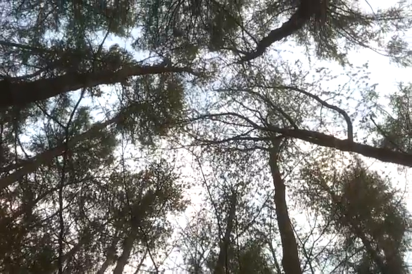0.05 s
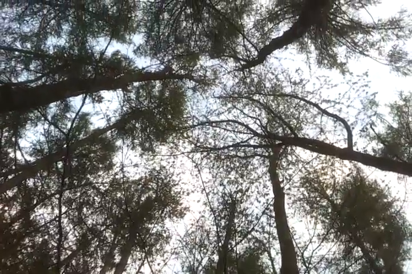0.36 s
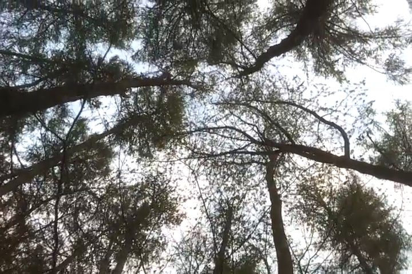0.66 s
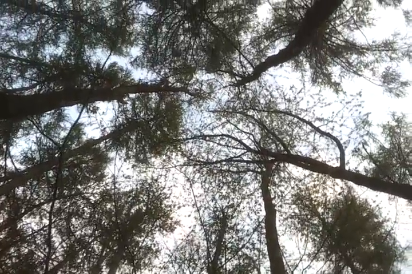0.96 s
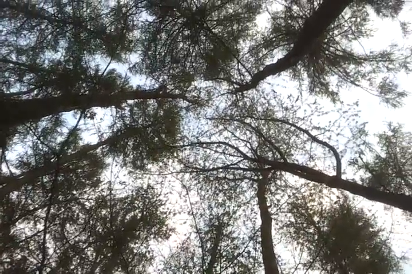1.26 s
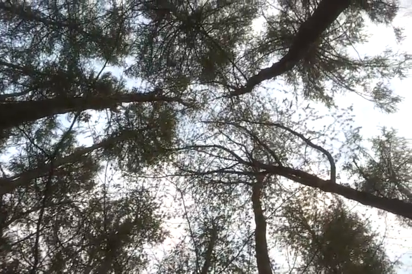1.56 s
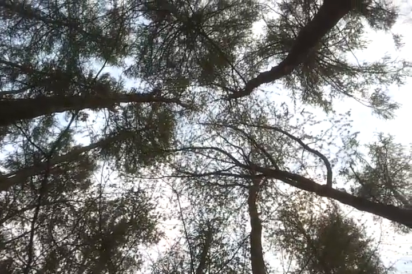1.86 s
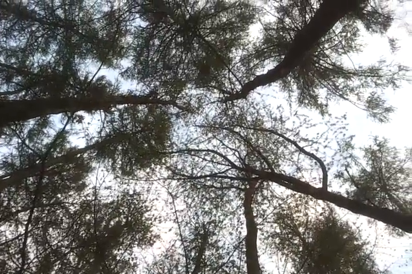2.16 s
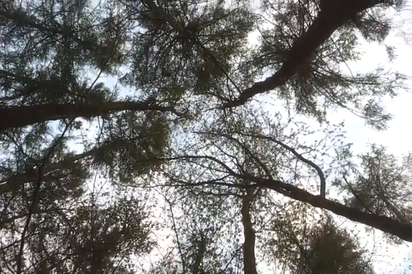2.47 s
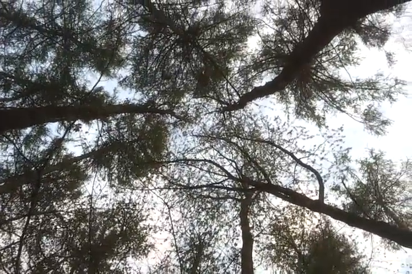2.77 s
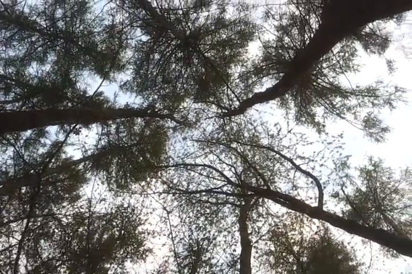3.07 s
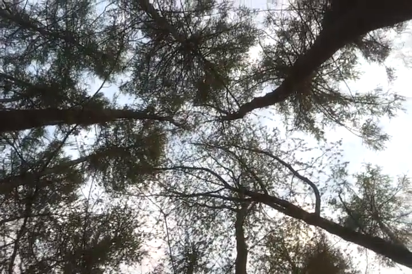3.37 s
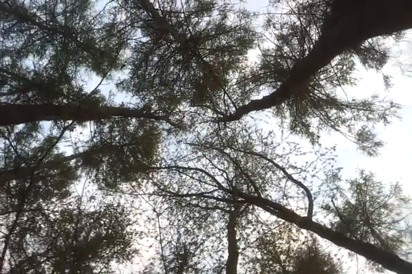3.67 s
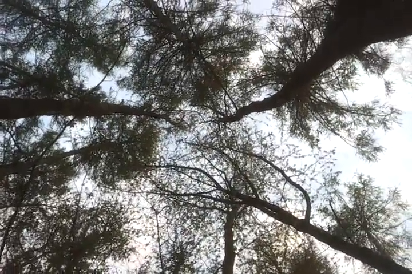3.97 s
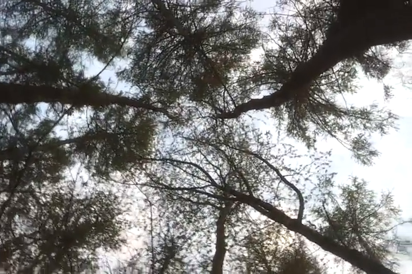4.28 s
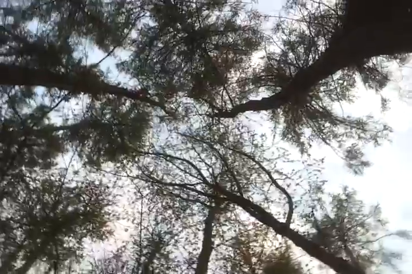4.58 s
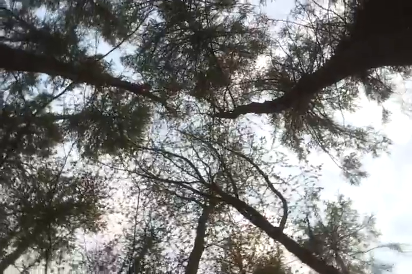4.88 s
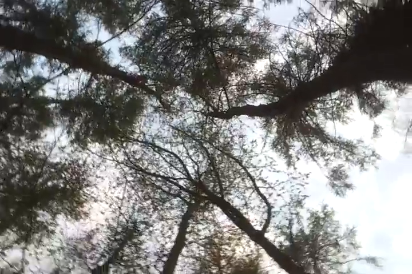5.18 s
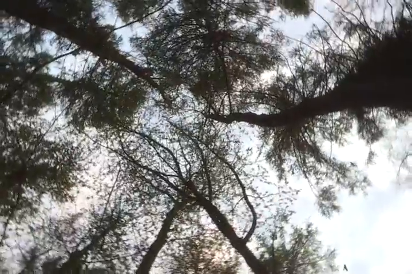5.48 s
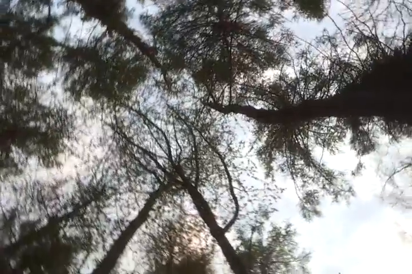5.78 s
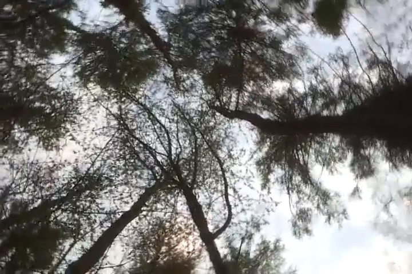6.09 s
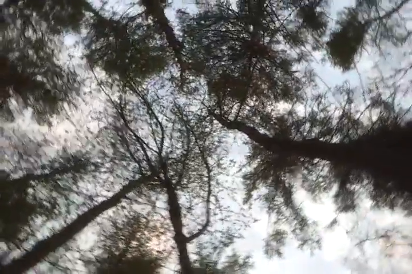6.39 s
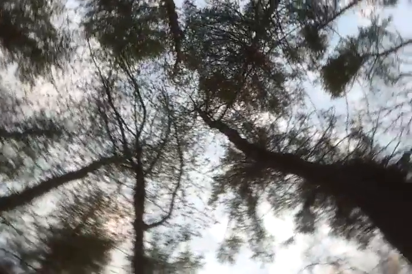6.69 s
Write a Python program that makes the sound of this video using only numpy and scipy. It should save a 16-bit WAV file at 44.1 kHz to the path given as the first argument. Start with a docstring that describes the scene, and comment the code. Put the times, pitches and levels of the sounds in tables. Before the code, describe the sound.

Wind strikes a phone microphone at once in a pine wood, with low rumbling, irregular knocks and overload ticks until about 1.9 seconds. Beneath it, small birds chirp thinly overhead, a distant bird gives faint reedy cries, and dry leaves rustle slightly around 1 second. A soft, steady hiss of trees lies behind everything.

From 2 seconds the wind sinks to a low rumble, with one bump near 2.6 and two tiny leaf crackles. The birds repeat high notes in quick, even series with soft echoing tails. The reedy cries return faintly around 3.3 seconds, and from about 4 to 4.7 a far bird draws a faint, lower whistle that slides down and up.

At 5.5 seconds a second, faster gust thumps and ticks on the microphone, with the loudest chirps above it, easing by the end near 7 seconds.

```python
"""A pine wood, on a phone's microphone, under the steady hiss of the trees. A gust knocks on the
microphone at once and overloads it until it ticks; small birds call high overhead, a distant one gives
reedy cries, and dry leaves rustle faintly underfoot. The wind sinks to a low rumble, the birds call on
in series, scattered into soft tails by trunks and crowns, and far off one draws a long, low whistle.
Last comes a second, faster gust, with the loudest calls above it."""
import sys
import numpy as np
from scipy import signal
from scipy.fft import rfft, irfft
from scipy.io import wavfile
from scipy.ndimage import uniform_filter1d, map_coordinates

SR = 44100
rng = np.random.default_rng(int(sys.argv[2]) if len(sys.argv) > 2 else 0)


def master_out(mix):
    """Clip the mix to full scale and print it as 16-bit PCM to the path in sys.argv[1]."""
    frames = np.transpose(np.atleast_2d(mix))
    ceiling = np.clip(frames, -1, 1)
    pcm = np.round(ceiling * 32767).astype(np.int16)
    wavfile.write(sys.argv[1], SR, pcm)


N = 302085
T = np.arange(N) / SR

# Eddies that strike the microphone. Each row: time in seconds, knock level in dB, tick level in dB.
STRIKES = [(0.047, -12, -15.5), (0.052, -18.5, -20), (0.092, -13.5, -30), (0.136, -16.5, -24),
           (0.17, -16, -23), (0.184, -18.5, -19), (0.221, -16, -27), (0.264, -16, -47), (0.311, -18.5, -26),
           (0.357, -19, -27.5), (0.388, -24.5, -43.0), (0.439, -11, -19), (0.487, -9.5, -29),
           (0.5, -16.5, -44), (0.546, -18, -45), (0.6, -11, -23.0), (0.634, -9, -41), (0.664, -19, -22),
           (0.685, -19.5, -40.5), (0.804, -18.5, -44.0), (0.816, -13, -25.5), (0.865, -14.5, -20.5),
           (0.917, -19.5, -41), (0.98, -16, -49), (1.038, -18, -40), (1.109, -24.5, -53.0),
           (1.214, -13, -43), (1.301, -17, -27.0), (1.387, -17, -24), (1.45, -11.5, -30.5),
           (1.518, -8.5, -46), (1.542, -14.5, -26), (1.552, -19, -30), (1.612, -25.5, -41),
           (1.641, -19, -56), (1.764, -14, -53), (1.81, -18.5, -53.0), (1.929, -33.5, -57),
           (2.584, -17.5, -53), (3.282, -37.5, -60), (3.459, -29, -48.0), (5.28, -29.5, -53.0),
           (5.521, -14.5, -34.5), (5.536, -9.5, -21), (5.656, -11.5, -19), (5.672, -9, -18.5),
           (5.713, -11, -16.0), (5.758, -6.5, -17), (5.779, -11, -27.5), (5.796, -11.5, -23.5),
           (5.821, -8, -28), (5.853, -14.5, -26), (5.863, -15.5, -17), (5.876, -10.5, -11.5),
           (5.911, -16, -19.5), (5.965, -13, -13), (5.983, -16, -22.0), (5.996, -14, -15.5),
           (6.011, -13, -21), (6.051, -17, -27.5), (6.083, -18.5, -49.5), (6.136, -12, -24),
           (6.153, -17.5, -27), (6.217, -12.5, -28), (6.227, -9.5, -16), (6.274, -14, -23.5),
           (6.308, -23, -24), (6.326, -20.5, -42.5), (6.496, -25, -52)]
# Wind at the microphone. Each row: time in seconds, strength of the flow in dB.
FLOW = [(0.0, -31.5), (0.05, -24), (.68, -24), (.76, -30), (1.85, -29), (2.06, -40.5), (2.54, -38),
        (2.62, -26.5), (2.98, -43), (3.26, -36), (4.3, -36.5), (5.62, -28.5), (5.76, -21), (6.73, -31.5),
        (6.85, -43)]
# Faster air lifts the second gust in pitch. Each row: time in seconds, relative speed.
AIR_SPEED = [(1.9, 0.97), (3.8, 0.92), (5.2, 1.1)]


def eddies(per_s=11, small_db=-4, scatter_db=3):
    """Every eddy that strikes, as (seconds, dB): the listed ones, and random ones that follow the flow."""
    chance = rng.random((int(per_s * N / SR), 2))
    times = chance[:, 0] * N / SR
    db = np.interp(times, *np.transpose(FLOW)) + small_db + scatter_db * (2 * chance[:, 1] - 1)
    return [(centre, knock_db) for centre, knock_db, _ in STRIKES] + list(zip(times, db))


def buffets(core_db=1.5, thump_db=-5, puff_db=-8, body_growth=0.46):
    """Each eddy knocks on the microphone: a short swing of pressure, a low thump just after, and a puff."""
    core_hz, core_s, thump_hz = 480, 0.00056, 105  # at a relative speed of 1
    thump_s, lag_s = 0.0028, 0.0038
    out, pattern = np.zeros(N), turbulence()
    t = np.arange(-SR // 40, SR // 40) / SR
    for centre, db in eddies():
        air, flow_db = (np.interp(centre, *np.transpose(curve)) for curve in (AIR_SPEED, FLOW))
        # the form of the swing depends on where the eddy passes the port
        side = np.sign(rng.random() - .5)
        pace = air * np.exp(0.074 * rng.standard_normal())
        core = side * bell(t * pace, core_s) * np.sin(2 * np.pi * core_hz * pace * t)
        thump = bell(t - lag_s, thump_s) * np.cos(2 * np.pi * (thump_hz * air * t + rng.random()))
        thump /= air ** 2
        swell = bell(t - lag_s / 2, 0.013 * 2 ** (flow_db / 20))  # longer in strong flow
        puff_speed = air * 1.85 * 2 ** (db / 45)
        i = rng.integers(len(pattern) - SR)
        puff = swell * sweep(pattern[i:i + SR // 2], np.full(len(t), puff_speed))
        puff *= np.linalg.norm(swell) / np.linalg.norm(puff)
        body = undb(body_growth * db) * (undb(thump_db) * thump + undb(puff_db) * puff)
        add(out, centre + t[0], undb(db + core_db) * core + body)
    return out


def ticks(pressure, typical_width_s=0.0005, rebound_s=0.0068, rebound_db=-9):
    """Overload bites a narrow cap out of the wave at each listed strike; the swing back ticks softly."""
    out = np.zeros(N)
    for start, _, db in STRIKES:
        rebound_at = start + rebound_s * (.5 + rng.random())
        for at, level_db in (start, db), (rebound_at, db + rebound_db):
            width = int(typical_width_s * np.exp(0.45 * rng.standard_normal()) * SR) + 2
            cap = (1 - np.linspace(-1, 1, width) ** 2) ** 1.02
            add(out, at, -np.copysign(undb(level_db), pressure[int(at * SR)]) * cap)
    return out


def turbulence():
    """The pattern of pressure that the air carries past the microphone."""
    # Spectrum at full flow. Each row: frequency in Hz, level in dB.
    spectrum = [(50, -12), (140, -1), (280, -8), (450, -21), (700, -34), (1200, -63), (3000, -64),
                (9000, -108)]
    return colour(rng.standard_normal(2 ** 18), spectrum)


def sweep(pattern, speed):
    """Faster air sweeps the pattern past sooner, so it sounds brighter."""
    return map_coordinates(pattern, [np.cumsum(speed)], order=3, mode="grid-wrap")


def rumble(full_db=-22, gustiness_db=3.5, doubling_db=65):
    """The flow over the microphone sets loudness and brightness of the rumble between the knocks."""
    db = np.interp(T, *np.transpose(FLOW)) + gustiness_db * walk(T, 45)
    speed = np.interp(T, *np.transpose(AIR_SPEED)) * 2 ** ((db - full_db) / doubling_db)
    return undb(db) * sweep(turbulence(), speed)


def deep_bass(trim_db=-2.5, thinning_db=40):
    """The largest, slowest swirls press on the microphone; they thin out as the air speeds up."""
    # Spectrum of the swirls. Each row: frequency in Hz, level in dB.
    spectrum = [(12, -44), (40, 6), (85, 3), (140, -0.5), (450, -53.5)]
    doublings = np.log2(np.interp(T, *np.transpose(AIR_SPEED)))
    db = np.interp(T, *np.transpose(FLOW)) - thinning_db * doublings
    return colour(rng.standard_normal(N), spectrum) * undb(db + trim_db)


def birds(beam_db=28, direct_db=-3.5, twigs_db=-6, trunks_db=-4.5, far_echo_db=8):
    """Every note arrives directly, smeared by the twigs round the bird, and again from the trunks."""
    far = low_whistle()
    direct, scattered = far * undb(direct_db), far * undb(far_echo_db)
    for start, note, contour, db, echo_db in [*call_series(), *lone_tones(), *reedy_cries()]:
        # the top of a note is its strongest part and is beamed at the microphone
        top_db = beam_db * (contour - contour.mean())
        add(direct, start, note * undb(db + direct_db + top_db))
        add(scattered, start, note * undb(db + echo_db))
    twigs = wood_echo(direct, t60=.08, build_s=.003)
    trunks = wood_echo(scattered, t60=.7, build_s=.012)
    return direct + undb(twigs_db) * twigs + undb(trunks_db) * trunks


def call_series(pitch_scatter=.008):
    """High in the crowns, small birds each repeat one note at an even pace."""
    # Repeated calls. Each row: start in seconds, number of notes, period and note length in seconds,
    # top pitch in Hz, level in dB, swell per note in dB, echo in dB, shape.
    series = [ (.11, 3, .161, .03, 5670, -52, -.8, -4, "rise"),
              (.589, 2, .382, .045, 5900, -55.5, -1, -1, "fall"),
              (2.552, 5, .157, 0.0097, 6740, -58, 1.5, 5, "rise"),
              (2.612, 5, .155, .065, 6080, -57, .6, 1, "fall"),
              (3.528, 4, .263, .032, 6150, -56, 1.8, -5, "fall"),
              (3.557, 2, .15, 0.09, 7240, -54, -3.5, -4, "sag"),
              (3.898, 3, 0.22, 0.14, 7800, -62.5, -2.5, -8, "sag"),
              (5.872, 2, .122, .085, 6380, -41, 1.2, 0, "hook"),
              (6.124, 3, 0.22, 0.15, 7980, -54.5, -0.5, 3.5, "bow"),
              (6.3, 3, 0.24, 0.082, 5880, -42, 1.1, 1, "step"), ]
    for start, count, period, length, hz, db, swell_db, echo_db, shape in series:
        for k in range(count):
            pitch = hz * (1 + pitch_scatter * rng.standard_normal())
            yield start + k * period, *bird_note(length, pitch, shape), db + k * swell_db, echo_db


def lone_tones(echo_db=0.5):
    """Chirps of the small birds and, near 2.5 kHz, a faint falling overtone of the distant reedy cries."""
    # The tones. Each row: start and length in seconds, top pitch in Hz, level in dB, shape.
    tones = [ (1.112, .085, 6570, -55, "hook"), (1.905, 0.06, 7880, -56.5, "peak"),
             (2.042, 0.09, 4440, -62, "lift"), (2.239, 0.12, 8150, -62, "sag"),
             (2.427, .1, 6050, -55, "scoop"), (3.299, .3, 2504, -67.5, "fall"),
             (3.339, 0.11, 7200, -53, "flat"), (3.35, 0.12, 7490, -57, "bow"),
             (5.177, 0.058, 6300, -50.5, "dip"), (5.308, 0.061, 6470, -46, "hook"),
             (5.465, 0.086, 8020, -51.5, "step"), (5.592, .08, 4100, -51.5, "flat"),
             (5.738, .08, 6580, -39, "step"), ]
    for start, length, hz, db, shape in tones:
        yield start, *bird_note(length, hz, shape), db, echo_db


def reedy_cries(echo_db=-1.5):
    """Farther off, one bird cries on a lower tone, reedy with harmonics."""
    # The cries. Each row: start and length in seconds, top fundamental in Hz, level in dB, shape.
    cries = [ (.045, .265, 1212, -57, "flat"), (.31, .12, 1215, -58, "warble"),
             (.6, .12, 1150, -62, "scoop"), (.74, .18, 1085, -61, "sag"), (.79, .2, 1225, -64.5, "sag"),
             (.87, .42, 1095, -63.5, "sag"), (3.2, .08, 1240, -63, "rise"),
             (3.28, .21, 1175, -61.5, "fall"), (3.42, .26, 1250, -64.5, "fall"), ]
    # Their harmonics. Each row: multiple of the fundamental, level in dB.
    partials = [(1, -5), (2, -12.5), (3, -12), (4, -2)]
    for start, length, hz, db, shape in cries:
        yield start, *bird_note(length, hz, shape, partials, waver=0.004, flutter_db=1.5), db, echo_db


def bird_note(length, hz, shape, partials=((1, 0),), waver=0.0075, flutter_db=4.0):
    """One note and its pitch contour: a gliding tone that trembles in pitch and strength."""
    # Contours by name. Each entry: pitch as a share of the top pitch, at even steps through the note.
    shapes = { "fall": [1, .89, .76], "rise": [.8, .87, 1], "hook": [.97, 1, .95, .85, .75, .7], "peak":
              [.83, .96, 1, .85, .79, .8], "sag": [1, .97, .91], "scoop": [1, .91, .88, .87], "bow": [.91,
              .99, 1, .98, .92], "step": [.94, 1, .98, .915, .9, .91], "lift": [.84, .98, 1, .99], "dip":
              [1, .9, .94, .98, 1], "flat": [1, .97, .95, .99], "warble": [1, .89, 1, .88, .84, .84], }
    t = np.arange(int(length * SR)) / SR
    steps = np.linspace(0, 1, len(shapes[shape]))
    contour = uniform_filter1d(np.interp(t / length, steps, shapes[shape]), len(t) // 6, mode="nearest")
    phase = 2 * np.pi * np.cumsum(hz * contour * (1 + waver * walk(t, 252.6))) / SR
    tone = sum(undb(db) * np.sin(k * phase) for k, db in partials)
    envelope = signal.windows.tukey(len(t), .3) * undb(flutter_db * walk(t, 175.5))
    return unit(envelope) * np.sqrt(2) * tone, contour


def low_whistle(waver=0.0227, flutter_db=3):
    """A far bird slides slowly down and up on one wavering tone."""
    # Course of the whistle. Each row: time in seconds, pitch in Hz, level in dB.
    course = [(3.93, 1985, -69), (4.057, 1881, -60), (4.25, 1680, -72), (4.422, 1718, -62),
              (4.599, 1706, -72), (4.65, 1950, -58), (4.76, 1944, -84)]
    times, hz, db = np.transpose(course)
    pitch = np.interp(T, times, hz) * (1 + waver * walk(T, 150))
    strength = np.interp(T, times, undb(db), left=0, right=0) * undb(flutter_db * walk(T, 25.2))
    return strength * np.sin(2 * np.pi * np.cumsum(pitch) / SR)


def wood_echo(x, t60, build_s):
    """The wood scatters a call into a dense echo that builds up and dies away."""
    t = T[:SR]
    echo = rng.standard_normal(SR) * (1 - np.exp(-t / build_s)) * np.exp(-np.log(1000) * t / t60)
    return signal.fftconvolve(x, echo / np.linalg.norm(echo))[:N]


def leaves():
    """Underfoot, dry leaves give way in clusters of tiny cracks."""
    # The rustles. Each row: start in seconds, length in seconds, level in dB.
    rustles = [(.72, 0.52, -57.5), (2.07, 0.022, -53), (2.723, 0.1, -51.5)]
    envelope = np.zeros(N)
    cracks = rng.standard_normal(N) * undb(2.2 * rng.exponential(size=N))
    crackle = colour(cracks, [(500, 6), (3000, -13), (5000, -4.0), (7000, 4), (11000, -16)])
    for start, length, db in rustles:
        add(envelope, start, np.hanning(int(length * SR)) * undb(db))
    return envelope * crackle


def trees(level_db=-59):
    """Air in the crowns: a smooth, steady hiss behind everything."""
    # Spectrum of the hiss. Each row: frequency in Hz, level in dB.
    spectrum = [(100, -65), (500, -18.5), (1000, -14.5), (2000, -21), (3500, -24), (6000, -21.5),
                (9000, -26), (12000, -30)]
    return colour(rng.standard_normal(N), spectrum) * undb(level_db)


def undb(db):
    """Decibels to gain."""
    return 10 ** (np.asarray(db) / 20)


def unit(x):
    """Scale to rms 1."""
    return x / np.sqrt(np.mean(x ** 2))


def add(out, start, x):
    """Mix a sound in at a time in seconds."""
    i = max(int(start * SR), 0)
    out[i:i + len(x)] += x[:max(N - i, 0)]


def colour(x, spectrum):
    """Filter by (Hz, dB) points; rms 1."""
    hz, db = np.transpose(spectrum)
    f = np.maximum(np.fft.rfftfreq(len(x), 1 / SR), 1)
    gain = undb(np.interp(np.log(f), np.log(hz), db))
    return unit(irfft(rfft(x) * gain, len(x)))


def walk(t, rate):
    """A random level that moves about rate times a second."""
    return np.interp(t * rate, np.arange(4096), rng.standard_normal(4096))


def bell(t, width):
    """A smooth swell round time zero."""
    return np.exp(-(t / width) ** 2 / 2)


def scene():
    """Birds overhead, leaves below, wind on the microphone; one channel."""
    return (birds() + leaves() + trees() + deep_bass() + rumble() + buffets())[None]


def record(dry):
    """The strongest buffets flatten against the microphone's limit, ticks join them, the top is cut."""
    limit, top_hz = .365, 11900
    flattened = dry / (1 + (dry / limit) ** 8) ** (1 / 8)
    lowpass = signal.ellip(10, .2, 80, top_hz, fs=SR, output="sos")
    return signal.sosfilt(lowpass, flattened + ticks(dry[0]))


dry = scene()
out = record(dry)
master_out(out)
```